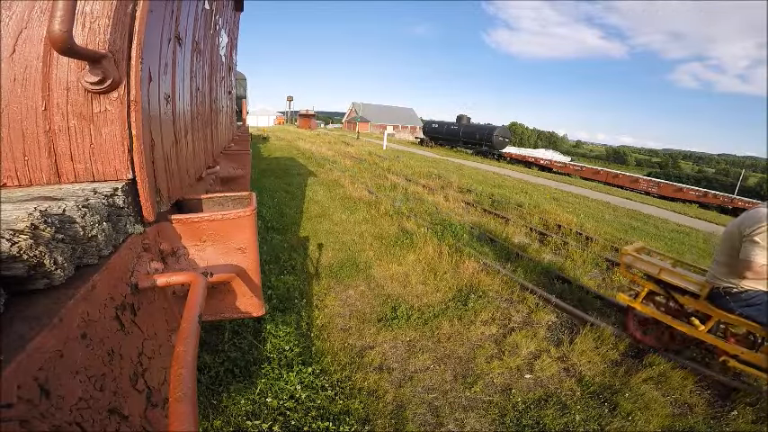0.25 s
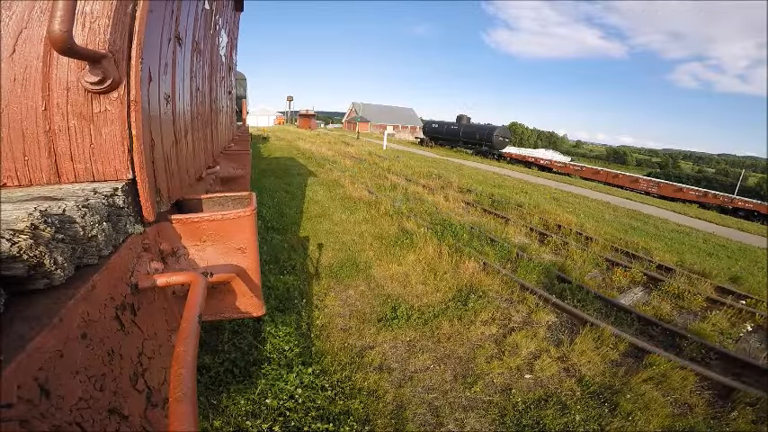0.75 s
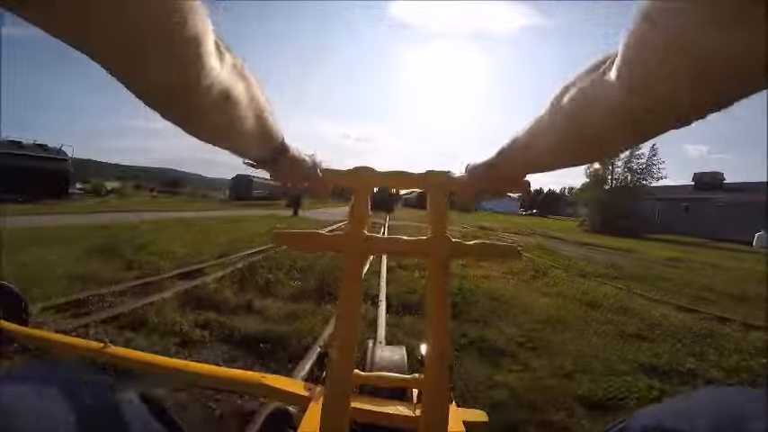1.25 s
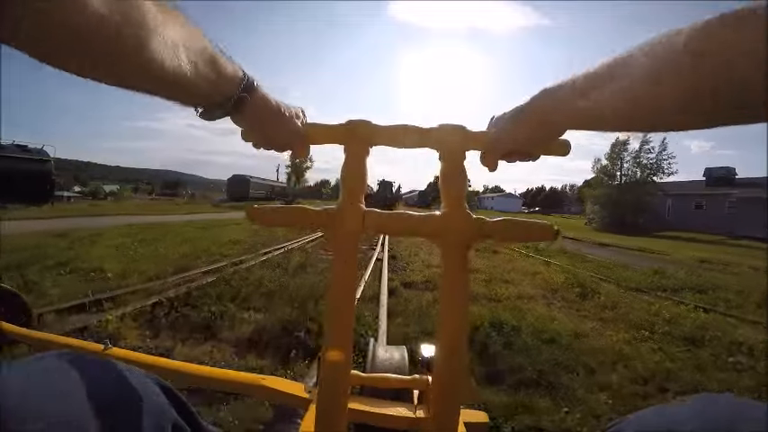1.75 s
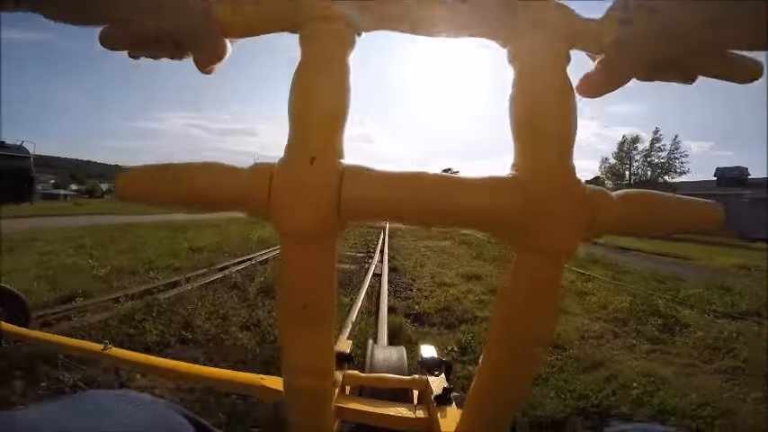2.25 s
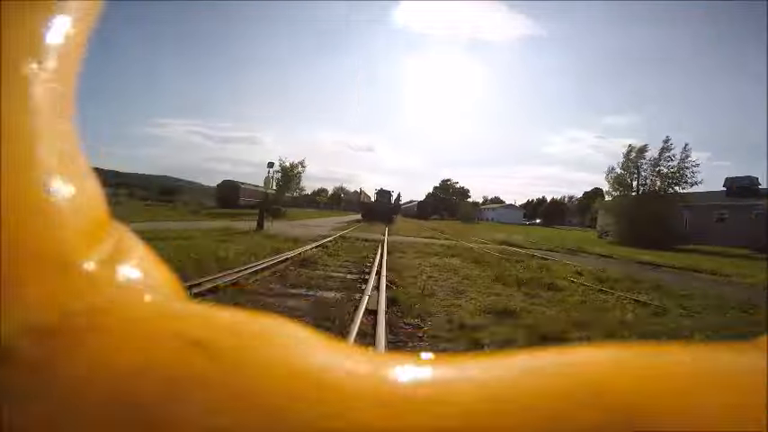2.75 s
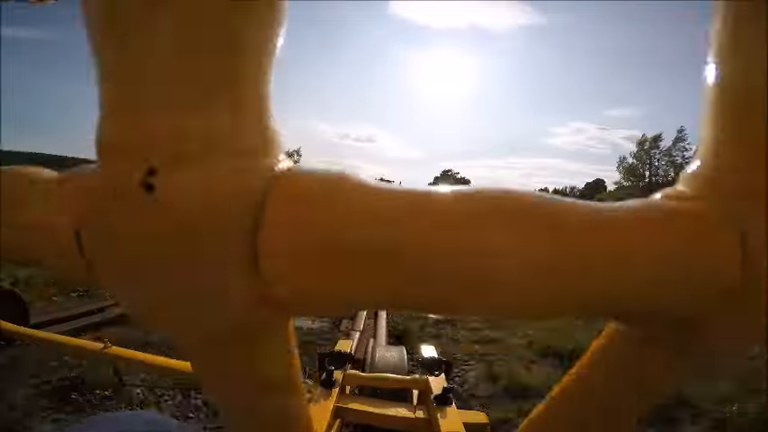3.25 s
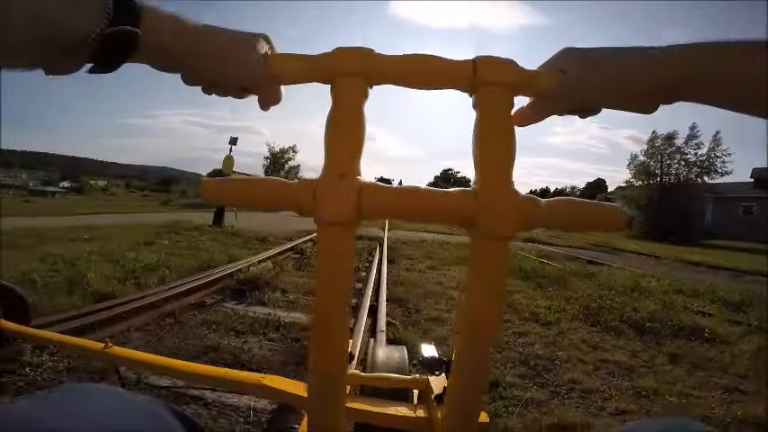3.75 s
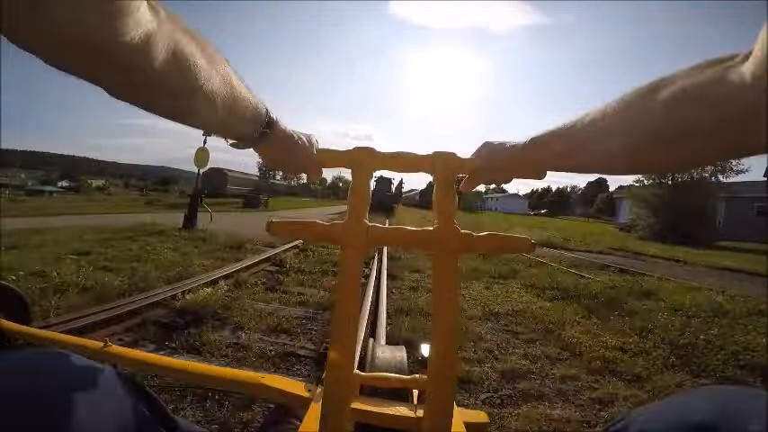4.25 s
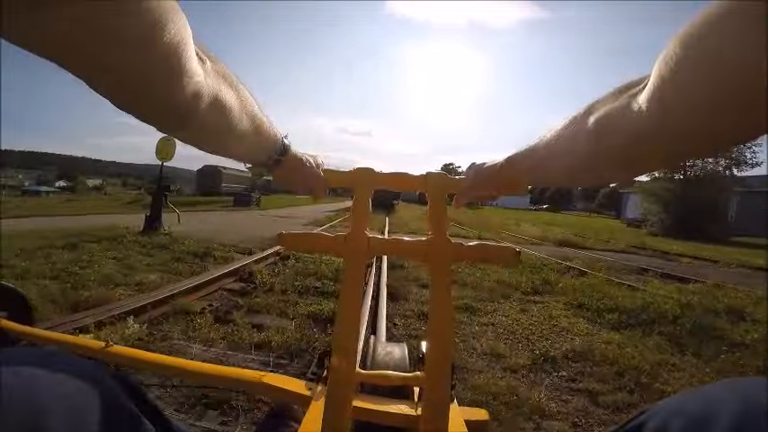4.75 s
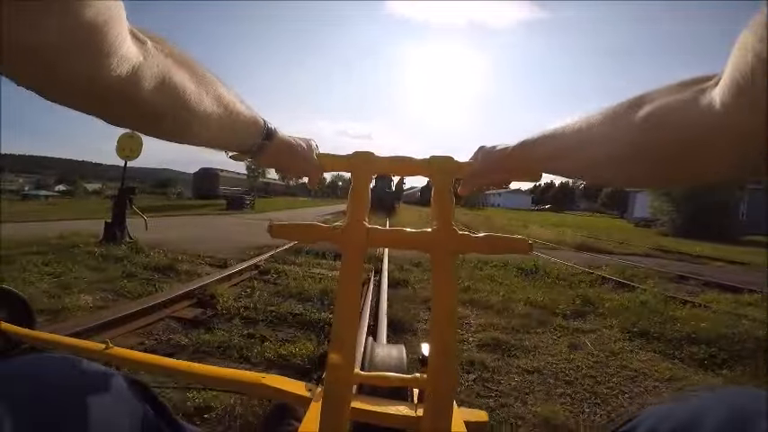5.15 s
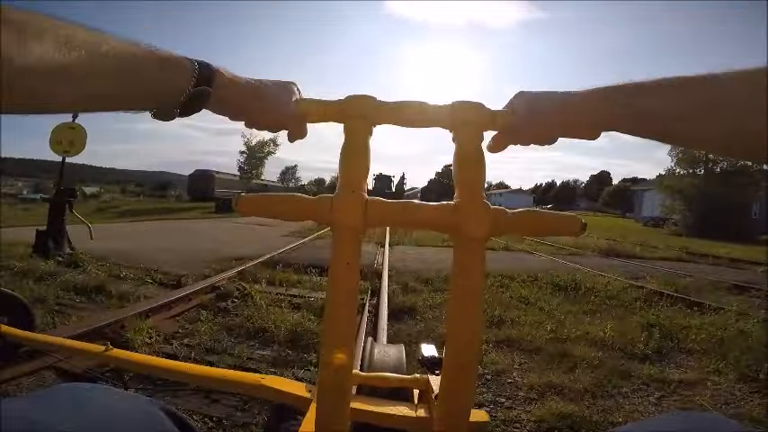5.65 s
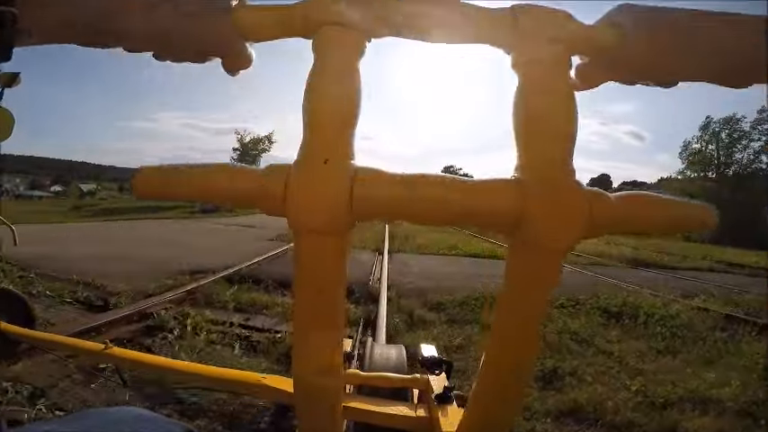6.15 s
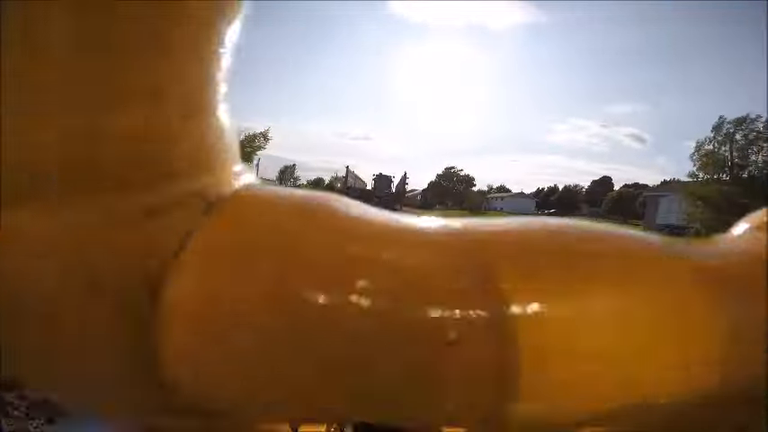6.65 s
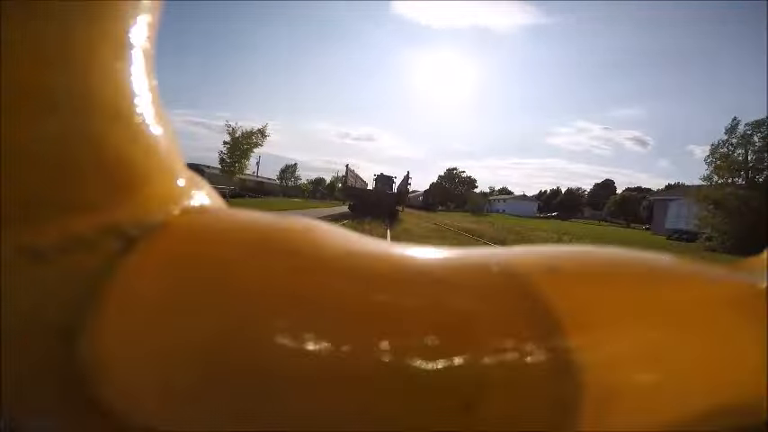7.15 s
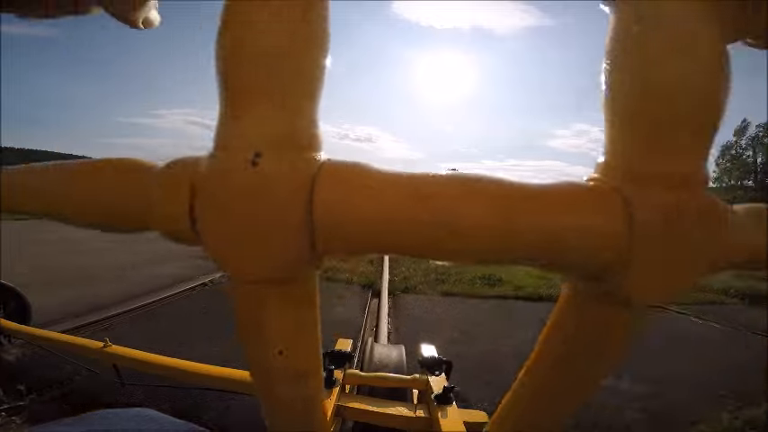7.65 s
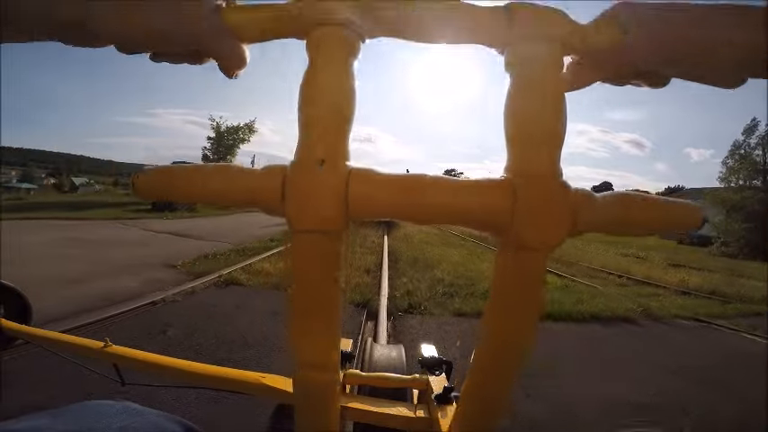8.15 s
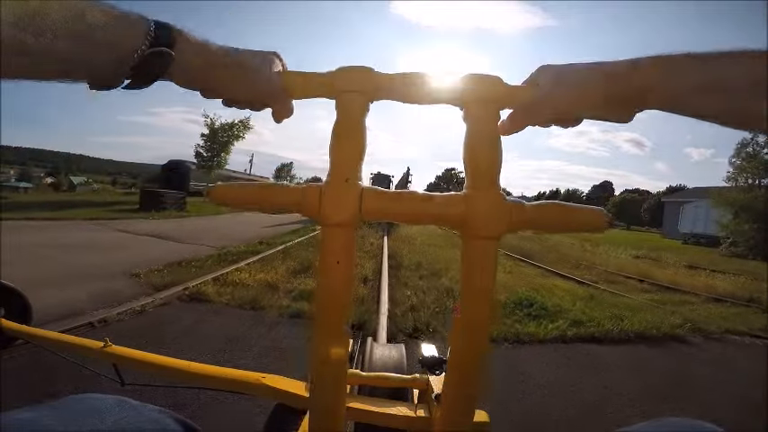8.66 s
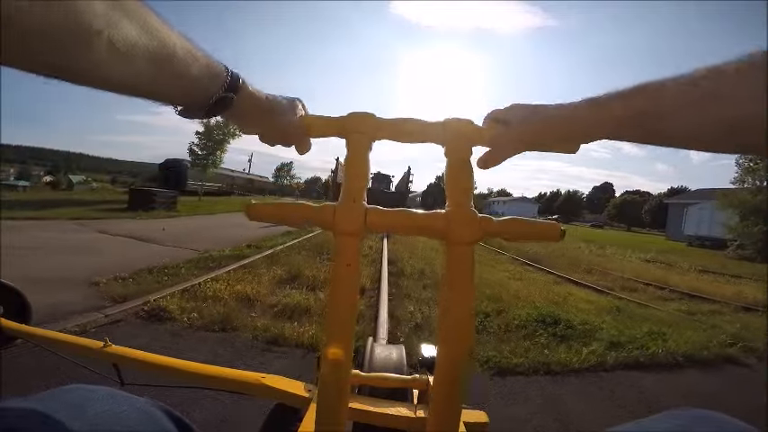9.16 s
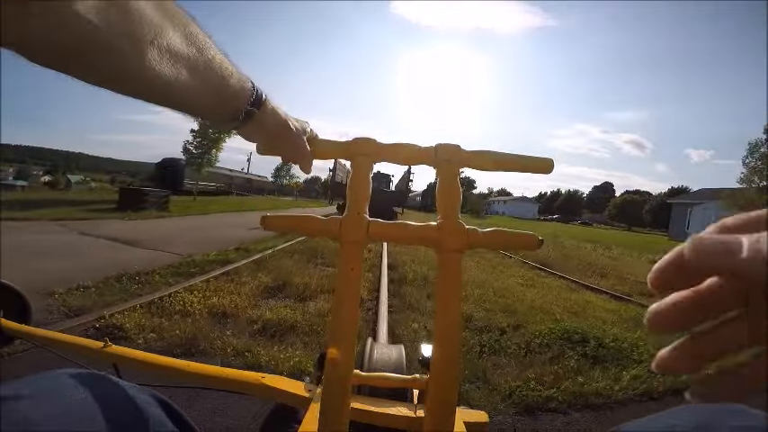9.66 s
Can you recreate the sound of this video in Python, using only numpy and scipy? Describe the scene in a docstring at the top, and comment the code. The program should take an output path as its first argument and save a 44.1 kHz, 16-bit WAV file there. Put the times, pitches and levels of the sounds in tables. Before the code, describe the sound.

A small rail cart passes faintly, then is heard from aboard: rumbling frame, ringing iron wheels, crushed grit, ticking slack gear, hard knocks on the camera.

```python
"""Riding a hand-pumped rail velocipede

Thin wheel swishes pass over a low outdoor drone; after about one second we hear the ride from the frame.
Noise-driven modes make the frame rumble and the iron wheels ring, and random fractures make grit and stones.
Struck modes make the slack drive gear tick and, twice, the pump handle knock and clatter on the camera.
The gear rings on briefly near the end; faint electronic hiss and whine run throughout."""
import sys
import numpy as np
from scipy import signal
from scipy.fft import rfft, irfft
from scipy.io import wavfile
from scipy.ndimage import uniform_filter1d, map_coordinates

SR = 44100
rng = np.random.default_rng(int(sys.argv[2]) if len(sys.argv) > 2 else 0)


def dump(signal):
    """Clip the signal to [-1, 1] and save it as 16-bit WAV at the path in sys.argv[1]."""
    limited = np.clip(np.atleast_2d(signal).T, -1, 1)
    pcm = np.round(limited * 32767).astype(np.int16)
    wavfile.write(sys.argv[1], SR, pcm)


N = 437472
TIME = np.arange(N) / SR

# Table levels are in dB; most layers add a trim of their own.
# wheel swishes heard from the trackside: (time [s], level [dB])
SWISHES = [(.09, -59), (.25, -56), (0.401, -55.5), (.5, -58), (.85, -59)]
# tone of the swishes: (frequency [Hz], density [dB per Hz])
SWISH_SPECTRUM = [(200, -14), (1100, 4), (1900, -5), (2450, 14), (2750, -2), (3200, 1), (4100, -3),
                  (9000, -24.5)]
# tone of the outdoor drone: (frequency [Hz], density [dB per Hz])
DRONE_SPECTRUM = [(60, -4.5), (88, 9), (125, -18.5), (280, -20), (400, -30.5), (2000, -29), (7000, -44),
                  (15500, -94)]
# faint electronic whine: (time [s], level [dB])
WHINE_LEVEL = [(1, -69.5), (1.1, -78.5), (7, -84.5), (9.9, -66.5)]
# rail roughness along the way: (time [s], frame rumble [dB], wheel ring [dB], grit [dB])
ROUGHNESS = [(1.04, -18.5, -36.5, -37), (1.2, -11, -28.5, -35.5), (1.53, -14.5, -36.5, -41),
             (2.32, -12.5, -33, -38), (3.64, -20.5, -43.5, -45.5), (3.79, -12.5, -38, -44),
             (4.29, -18.5, -37.5, -45.5), (4.48, -14.5, -30, -33.5), (5.56, -13, -32.5, -40),
             (5.84, -16, -35.5, -39.5), (6.35, -13, -32, -40.5), (6.78, -14.5, -26.5, -32.5),
             (7.21, -21.5, -43, -48.5), (7.72, -16.5, -36.5, -50), (8.0, -13.5, -36, -44.5),
             (8.7, -15.5, -36.5, -51.5), (9.11, -12, -31, -46.5), (9.8, -13.5, -47, -57)]
# travel of the wheel, two to three turns a second: (time [s], turns [count])
WHEEL_TURNS = [(.95, -1), (4, 8), (4.45, 9), (6.9, 16), (7.8, 18), (10.22, 25)]
# sand on the rail: (time [s], peak level above the grit [dB])
SAND_PATCHES = [(3.929, 17), (5.788, 9), (9.881, 9.5)]
# modes of the springy frame: (frequency [Hz], level [dB], t60 [s])
FRAME_MODES = [(66.3, -22, 0.75), (99.76, -1, 0.3), (160.2, -4.5, 0.33)]
# tone of the loose shaking under the rumble: (frequency [Hz], density [dB per Hz])
SHAKE_SPECTRUM = [(12, -21.5), (26, -0.5), (120, 6), (180, 0), (210, -17), (280, -20.5), (400, -35.5),
                  (900, -77)]
# rough spots on the rail set a wheel ringing: (time [s], level [dB])
ROUGH_SPOTS = [(4.376, -15), (5.193, -16.5), (5.485, -17.5), (6.139, -15), (6.181, -12), (6.243, -10),
               (6.296, -16.5), (6.336, -13), (6.654, -15), (8.121, -13.5), (9.314, -21.5), (9.379, -17),
               (9.52, -13.5)]
# modes of the iron tyre: (frequency [Hz], level [dB], t60 [s])
TYRE_MODES = [(605.3, -14.5, 0.23), (676.3, 2, 0.066)]
# hum of the spokes: (frequency [Hz], level [dB], t60 [s])
SPOKE_MODES = [(264, -15, 0.081)]
# a wheel crushes a small stone: (time [s], level [dB], decay time constant [s])
CRUSHED_STONES = [(1.234, -20, 0.088), (1.299, -3.5, 0.007), (1.594, -8.5, 0.01), (1.788, -16, 0.0071),
                  (1.825, -16, 0.016), (1.864, -14, 0.0063), (1.97, -14.5, 0.014), (4.453, -15, 0.017),
                  (4.518, -13, 0.028), (4.663, -16, 0.018), (4.86, -15.5, 0.022), (4.967, -6, 0.012),
                  (5.021, -17.5, 0.0089), (5.487, -3.5, 0.0078), (5.503, -7.5, 0.038), (6.586, -7.5, 0.036),
                  (7.231, -23.5, 0.043), (8.109, -9, 0.018), (8.128, 2.5, 0.0043), (9.866, -17.5, 0.0082)]
# how the wheel colours the grit: (frequency [Hz], density [dB per Hz])
WHEEL_SPECTRUM = [(300, -30.5), (520, -6), (930, -4), (1030, 3.5), (1300, 0.5), (1550, -8), (2100, -11.5),
                  (2750, -19.5), (3300, -31.5), (6800, -49.5), (9000, -72)]
# the flange rubs the rail head: (time [s], level relative to the grit [dB])
FLANGE_LEVEL = [(1, -3.5), (3.7, -5), (4.4, -3.5), (5.6, -2.5), (6, -9.5), (6.9, -7.5), (7.3, -10.5)]
# tone of the flange rub: (frequency [Hz], density [dB per Hz])
RUB_SPECTRUM = [(1700, -22), (2080, 9.5), (2300, -14), (2750, -1.5), (3250, -29.5), (3780, -19),
                (5200, -45.5), (5850, -25.5), (9000, -61)]
# slack gear teeth strike: (time [s], level [dB])
TOOTH_TICKS = [(1.326, 0), (1.354, -6.5), (1.388, -10.5), (1.666, -17), (1.707, -17.5), (2.064, -17.5),
               (2.121, -15.5), (2.151, -17.5), (2.159, -21), (2.193, -13.5), (2.236, -12), (2.269, -13),
               (2.291, -21), (2.308, -25), (2.331, -18.5), (2.357, -18.5), (2.398, -12), (2.418, -13),
               (2.443, -12), (2.471, -18), (2.488, -18), (2.504, -21.5), (2.829, -18.5), (2.844, -15.5),
               (3.1333, -21.5), (3.158, -28), (3.175, -22), (3.186, -25), (3.234, -29.5), (3.382, -24),
               (3.4177, -27), (3.430, -21.5), (3.463, -26), (3.584, -23.5), (3.674, -22.5), (3.698, -22.5),
               (6.716, -12), (6.748, -13), (6.769, -18), (6.793, -23), (6.806, -18), (6.836, -17),
               (6.849, -19), (7.501, -26), (7.811, -17.5), (7.845, -23.5), (7.8837, -30), (7.92, -19.5),
               (7.976, -19), (8.043, -24), (8.191, -16), (8.21, -16), (8.305, -19), (8.462, -15),
               (8.586, -17.5), (8.619, -21.5), (8.855, -15), (8.906, -18.5), (8.980, -3.5), (9.109, -8.5),
               (9.126, -18), (9.152, -23.5), (9.183, -24)]
# how sharply the teeth meet: (time [s], boost of gear modes above 3 kHz [dB])
TOOTH_BITE = [(1.3, -5), (2.2, 11), (7.9, 3.5), (9, -6)]
# nominal modes of the iron gear: (frequency [Hz], level [dB], t60 [s])
GEAR_MODES = [(877, 2, 0.032), (1070, 4.5, 0.028), (1652, 2.5, 0.031), (1876, -3.5, 0.053),
              (3816, -16, 0.016), (4060, -22.5, 0.005), (5070, -25, 0.0082), (5440, -31, 0.0073),
              (6600, -27, 0.011)]
# bright snap of gear and handle: (frequency [Hz], density [dB per Hz])
SNAP_SPECTRUM = [(1500, 14), (3500, 2.5), (5500, -4.5), (7000, 0), (8500, -7), (16000, -36)]
# handle knocks and clatters on the camera: (time [s], clack level [dB], thud level [dB])
HANDLE_KNOCKS = [(2.764, 8, -5.5), (2.8644, 1.5, -6), (2.9159, -3, 1), (2.940, -10, -6), (2.966, -27, -18),
                 (2.988, -8.5, -5), (3.006, -15, -12), (3.026, -12.5, -9), (3.0568, -4, -2.5),
                 (6.876, 8.5, 0.5), (6.927, -18, -24), (6.951, -2.5, -4.5), (6.9762, -14, -20),
                 (6.9852, -13, -13), (7.010, -19, -17), (7.043, -21, -19), (7.066, -17.5, -16.5),
                 (7.08, -18.5, -16)]
# how squarely the handle lands, sharp first and glancing later: (time [s], snap over clack [dB])
KNOCK_SHARPNESS = [(3, 11.5), (7, -30.5)]
# nominal modes of the plastic case: (frequency [Hz], level [dB], t60 [s])
CASE_MODES = [(777, 6.5, 0.018), (1450, -0.5, 0.008), (2020, 6.5, 0.0096), (2450, 9.5, 0.012),
              (2850, -7.5, 0.0068), (3640, -15.5, 0.011), (5200, -14.5, 0.0055)]
# tone of the mount's thud: (frequency [Hz], density [dB per Hz])
THUD_SPECTRUM = [(30, 4.5), (90, -4), (180, 1), (350, -2), (520, -6.5), (900, -13.5), (2500, -58.5)]
# the gear rings on once: (start [s], length [s], level [dB])
GEAR_RING_ON = (9.11, 0.1, -20.5)

ABOARD_S = 1.031  # start of the change from trackside to frame
WHINE_HZ = 12617
# the wheel is out of round: each layer swells and sinks by this much once a turn
RUMBLE_SWELL_DB, RING_SWELL_DB, GRIT_SWELL_DB = 1.2, 1.5, 1.5
SAND_S = 0.03  # half-width of a sand patch's bell curve
BUMP_RISE_S = 0.011
CRUNCH_PER_S, CRUNCH_RISE_S, BED_DB = 42, .0032, -4
CLICK_DB, CLICK_LO_HZ, CLICK_HI_HZ = 28, 1360, 1840
# resting pitch, nominal starting rise in pitch, and decay time constant of the thud
THUD_END_HZ, THUD_SAG_HZ, THUD_S = 160.5, 403, 0.00934
EDGE_HZ = 16000  # upper band limit


def amp(db):
    """Decibels to gain."""
    return 10 ** (np.asarray(db) / 20)


def evened(x):
    """Scales to an rms of 1."""
    return x / np.sqrt(np.mean(x ** 2) + 1e-20)


def gains(rows):
    """One gain curve for each dB column of a table."""
    s, *columns = np.transpose(rows)
    return [amp(np.interp(TIME, s, c)) for c in columns]


def add(mix, s, sound):
    """Mixes a sound in at time s."""
    part = mix[max(round(s * SR), 0):][:len(sound)]
    part += sound[:len(part)]


def coloured(x, points):
    """Causal minimum-phase filter with the given spectrum and unit energy."""
    hz, db = np.transpose(points)
    bins_hz = abs(np.fft.fftfreq(8192, 1 / SR)) + 1
    log_gain = np.log(amp(np.interp(np.log(bins_hz), np.log(hz), db)))
    response = np.fft.ifft(np.exp(np.conj(signal.hilbert(log_gain)))).real[:4096]
    return signal.oaconvolve(x, response / np.linalg.norm(response))[:len(x)]


def noise():
    """White noise for the whole duration."""
    return rng.standard_normal(N)


def drift(hz):
    """Random wander of rms 1, mostly slower than hz."""
    rolloff = 1 + (np.fft.rfftfreq(N, 1 / SR) / hz) ** 4
    return evened(irfft(rfft(noise()) / rolloff, N))


def steadied(x, span_s):
    """Evens out level changes slower than span_s."""
    return x / np.sqrt(abs(uniform_filter1d(x ** 2, int(span_s * SR))) + 1e-12)


def band(x, lo_hz, hi_hz, order=3):
    """Causal band-pass."""
    edges = [lo_hz, min(hi_hz, SR / 2.1)]
    return signal.sosfilt(signal.butter(order, edges, "band", fs=SR, output="sos"), x)


def struck(modes, scatter_db=0):
    """Ring of a body after one blow; scatter lets each striking point favour other modes."""
    hz, db, t60 = np.transpose(modes)[:, :, None]
    t = TIME[:SR // 4]
    size = amp(db + scatter_db * rng.standard_normal(hz.shape))
    return (size * np.exp(-np.log(1000) * t / t60) * np.sin(2 * np.pi * hz * t)).sum(0)


def driven(force, modes):
    """A body's answer to a running force."""
    ring = struck(modes)
    return signal.oaconvolve(force, ring / np.linalg.norm(ring))[:N]


def grains(per_s, spread_db):
    """Random tiny fractures, a few much larger than the rest."""
    size = amp(spread_db * np.minimum(rng.exponential(1, N), 4))
    return evened(size * noise() * (rng.random(N) < per_s / SR))


def burst(decay_s):
    """A dying puff of noise of unit energy."""
    t = TIME[:SR // 4]
    puff = rng.standard_normal(len(t)) * np.exp(-t / decay_s)
    return puff / np.linalg.norm(puff)


def surge(rise_s):
    """An envelope that reaches 1 after rise_s and dies away a little more slowly."""
    u = TIME[:SR // 4] / rise_s
    return u * np.exp(1 - u)


def trackside():
    """Thin swishes of grainy wheel noise over a low outdoor drone."""
    swishes = sum(amp(db + 7.0) * np.exp(-((TIME - s) / 0.033) ** 2) for s, db in SWISHES)
    level = amp(-62.5) + swishes
    wheels = level * evened(coloured(grains(3000, 1.9), SWISH_SPECTRUM)) * amp(2 * drift(25))
    drone = amp(-42.5) * steadied(coloured(noise(), DRONE_SPECTRUM), 0.92)
    return wheels + drone


def electronics():
    """The camera's faint hiss and whine, with a fuzzy line an octave below."""
    phase = 2 * np.pi * WHINE_HZ * TIME
    fuzzy_line = drift(60) * np.sin(phase / 2)
    hiss = amp(2.0) * noise()
    return gains(WHINE_LEVEL)[0] * (np.sin(phase) + fuzzy_line + hiss)


def rolling():
    """Levels of rumble, ring and grit: rail roughness, a swell with each wheel turn, and patches of sand."""
    shake, ring, crunch = gains(ROUGHNESS)
    swell = np.cos(2 * np.pi * np.interp(TIME, *np.transpose(WHEEL_TURNS)))
    sand_db = sum(db * np.exp(-((TIME - s) / SAND_S) ** 2) for s, db in SAND_PATCHES)
    shake = shake * amp(1.5 + RUMBLE_SWELL_DB * swell)
    ring = ring * amp(3.5 + RING_SWELL_DB * swell)
    crunch = crunch * amp(0.5 + GRIT_SWELL_DB * swell + sand_db)
    return shake, ring, crunch


def rumble(level):
    """Uneven rail shakes the springy frame."""
    frame = evened(band(driven(noise(), FRAME_MODES), 45, 155.7, order=4))
    shake = evened(coloured(noise(), SHAKE_SPECTRUM))
    body = steadied(frame + amp(-5.0) * shake, 0.15)
    return level * body * amp(-1 + 1.6 * drift(3.4))


def wheel_ring(level):
    """Rail roughness keeps the tyre singing and the spokes humming; rough spots make both surge."""
    bumps = np.zeros(N)
    for s, db in ROUGH_SPOTS:
        add(bumps, s, amp(db) * surge(BUMP_RISE_S))
    singing = level * amp(1.0) * steadied(driven(noise(), TYRE_MODES), 0.43) * amp(4.06 * drift(26))
    surging = bumps * steadied(driven(noise(), TYRE_MODES), 0.13)
    spoke_level = (level + amp(-4.5) * bumps) * amp(SPOKE_MODES[0][1])
    spokes = spoke_level * driven(noise(), SPOKE_MODES)
    return band(singing + surging, 559, 880, order=2) + spokes


def stones():
    """Crushed stones release dense showers of fractures that die away."""
    envelope = np.zeros(N)
    for s, db, decay_s in CRUSHED_STONES:
        add(envelope, s, amp(db - 6.5) * np.exp(-TIME[:SR // 4] / decay_s))
    return envelope * steadied(grains(3000, 0.74), 0.00071)


def flange(force):
    """The flange turns the crushing force into a rough ring on the rail head."""
    rub = force * gains(FLANGE_LEVEL)[0] * amp(-4.0 + 3.82 * drift(35))
    ring = coloured(rub, RUB_SPECTRUM)
    # a wandering delay makes the pitch waver as the contact shifts
    return map_coordinates(ring, [(TIME + .0005 * drift(8)) * SR])


def grit(level):
    """Rust grinds dully under iron treads, sand cracks in short bright crunches, stones burst, the flange rubs."""
    # each contact patch crushes its own clumps and colours them in its own way
    clumps = np.zeros(N)
    for _ in range(3):
        fractures = grains(1600, 1.9) * amp(1.7 * drift(18.0))
        clumps += signal.oaconvolve(fractures, burst(0.0012))[:N]
    starts = rng.uniform(0.43, 1, N) * (rng.random(N) < CRUNCH_PER_S / SR)
    crunches = signal.oaconvolve(starts, surge(CRUNCH_RISE_S))[:N]
    bed = amp(BED_DB) * band(evened(clumps), 440, 2200, order=1)
    bright = steadied(clumps * (.16 + crunches), 0.2)
    force = amp(2) * level * (bed + bright) + stones()
    return coloured(force, WHEEL_SPECTRUM) + flange(force)


def gear():
    """Each tooth clicks dryly and rings the iron gear; soft blows chatter, hard ones snap most."""
    clicks, rings, snaps = np.zeros((3, N))
    for s, db in TOOTH_TICKS:
        bite_db = np.interp(s, *np.transpose(TOOTH_BITE))
        stiffness = rng.uniform(.98, 1.02)
        modes = [(hz * stiffness, d + bite_db * (hz > 3000), t60) for hz, d, t60 in GEAR_MODES]
        ring = struck(modes, scatter_db=3.0)
        rough_ring = signal.fftconvolve(ring, burst(0.0053))[:len(ring)]
        ring = amp(-10.0) * (ring + amp(-2) * rough_ring)
        blows = [(s, 1)]
        gap_s, kept = rng.uniform(.009, .015), rng.uniform(.5, .8)
        if db < -17.5:  # two weakening rebounds
            blows += [(s + k * gap_s, kept ** k) for k in (1, 2)]
        for at, share in blows:
            add(clicks, at, [share * amp(db + CLICK_DB)])
            add(rings, at, share * amp(db) * ring)
        add(snaps, s, amp(1.45 * db - 3.0) * burst(0.001))
    clicks = band(clicks, CLICK_LO_HZ, CLICK_HI_HZ)
    return clicks + band(rings, 500, 6200, order=7) + coloured(snaps, SNAP_SPECTRUM)


def handle():
    """The handle chatters on the camera: a snap, the clack of its plastic case, a sinking thud of its mount."""
    clacks, thuds, snaps = np.zeros((3, N))
    t = TIME[:SR // 4]
    fade = np.exp(-t / THUD_S)
    for s, clack_db, thud_db in HANDLE_KNOCKS:
        rebounds = rng.standard_normal(len(t)) * (rng.random(len(t)) < 500 / SR)
        contact = amp(-11.5) * rebounds * np.exp(-t / 0.0047)
        contact[0] = 1  # the blow itself, followed by small rebounds
        # the thud sinks in pitch as it dies away
        pitch_hz = THUD_END_HZ + THUD_SAG_HZ * rng.uniform(.5, 1.4) * fade
        sag = fade * np.sin(2 * np.pi * np.cumsum(pitch_hz) / SR)
        thud = .5 * contact + amp(-19) * sag / np.linalg.norm(sag)
        modes = [(hz * rng.uniform(.95, 1.05), db, t60) for hz, db, t60 in CASE_MODES]
        case = struck(modes, scatter_db=1.5)
        clack = signal.fftconvolve(case, contact + amp(-1.5) * burst(0.0032))
        snap_db = clack_db + np.interp(s, *np.transpose(KNOCK_SHARPNESS))
        add(clacks, s, amp(clack_db - 15.5) * clack)
        add(thuds, s, amp(thud_db + 22.5) * thud)
        add(snaps, s, amp(snap_db) * signal.fftconvolve(burst(0.0017), contact))
    clacks = band(clacks, 350, 8000, order=2)
    return clacks + coloured(thuds, THUD_SPECTRUM) + coloured(snaps, SNAP_SPECTRUM)


def ring_on():
    """A rough ring of the iron gear, wavering in pitch and level."""
    s, length_s, db = GEAR_RING_ON
    swell = np.sin(np.pi * np.clip((TIME - s) / length_s, 0, 1)) * amp(5.3 * drift(70))
    pitch_hz = 860 + 25 * drift(64)
    return amp(db) * swell * np.sin(2 * np.pi * np.cumsum(pitch_hz) / SR)


def scene():
    """The trackside view, then the ride, with the electronics throughout."""
    shake, ring, crunch = rolling()
    aboard = np.clip((TIME - ABOARD_S) / .004, 0, 1)  # 4 ms crossfade
    closing = np.clip((TIME[-1] - TIME) / .008, 0, 1)  # 8 ms fade-out
    ride = rumble(shake) + wheel_ring(ring) + grit(crunch) + gear() + handle() + ring_on()
    return ((1 - aboard) * trackside() + aboard * closing * ride + electronics())[None]


def record(dry):
    """The hardest knocks softly overload the microphone; then the band limit."""
    clipped = .96 * dry / (1 + dry ** 8) ** (1 / 8)
    low_pass = signal.firwin(255, EDGE_HZ, window=("kaiser", 8), fs=SR)
    return signal.oaconvolve(clipped, low_pass[None], "same")


dry = scene()
out = record(dry)
dump(out)
```